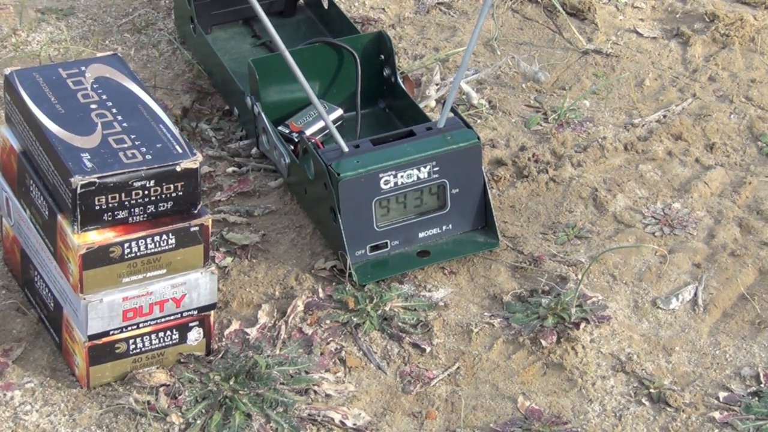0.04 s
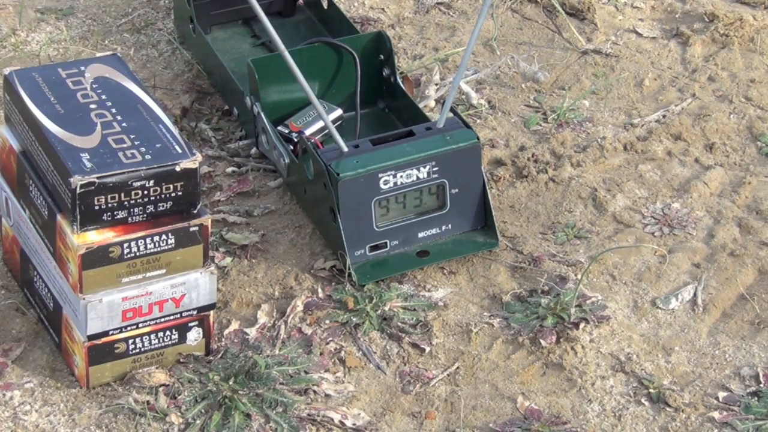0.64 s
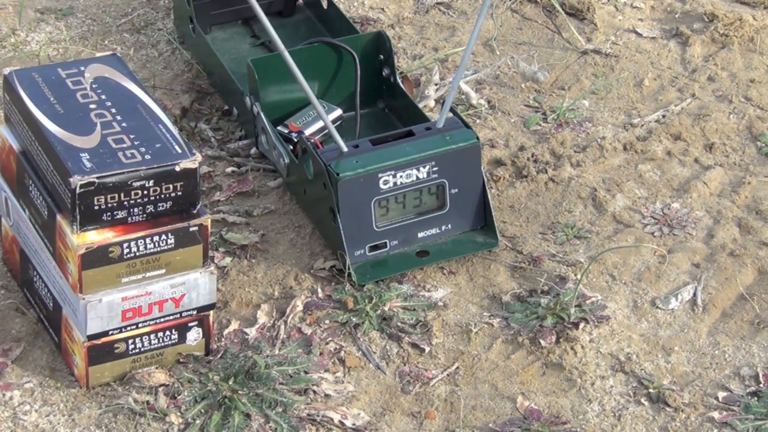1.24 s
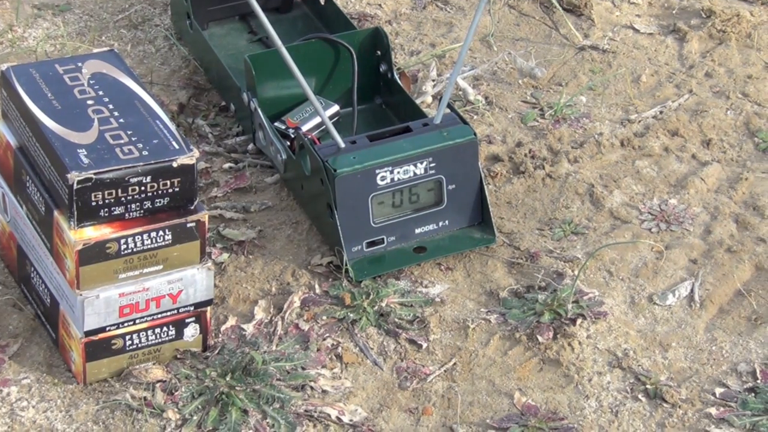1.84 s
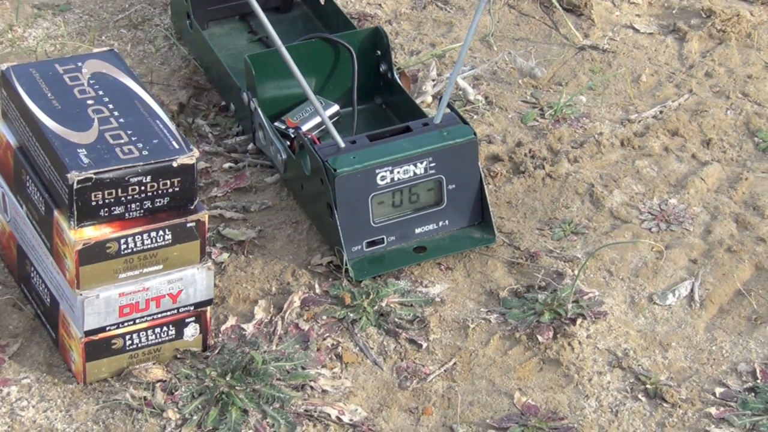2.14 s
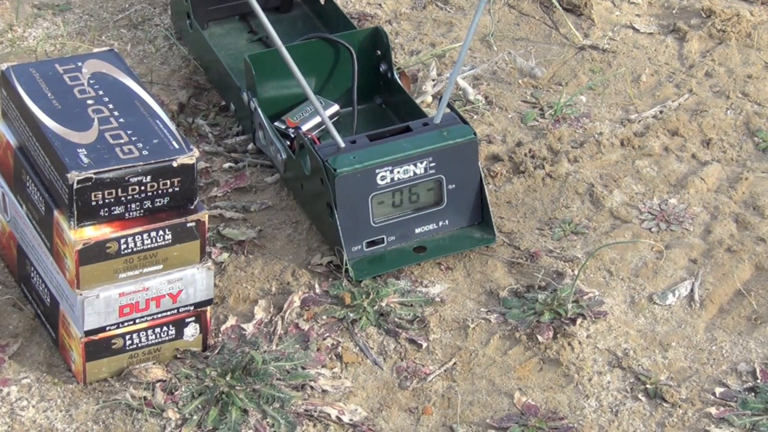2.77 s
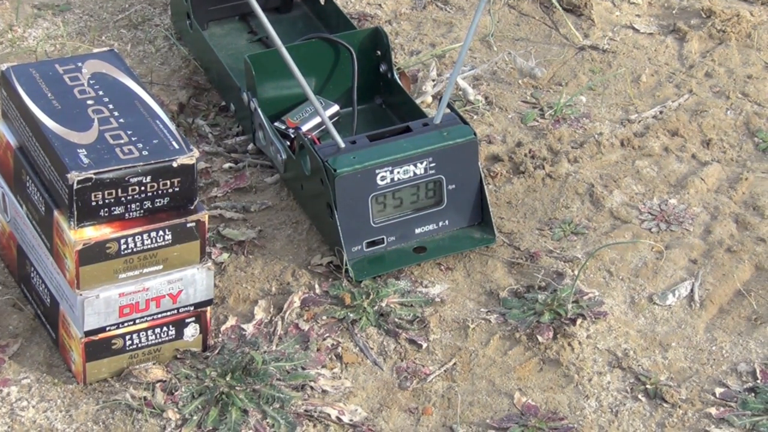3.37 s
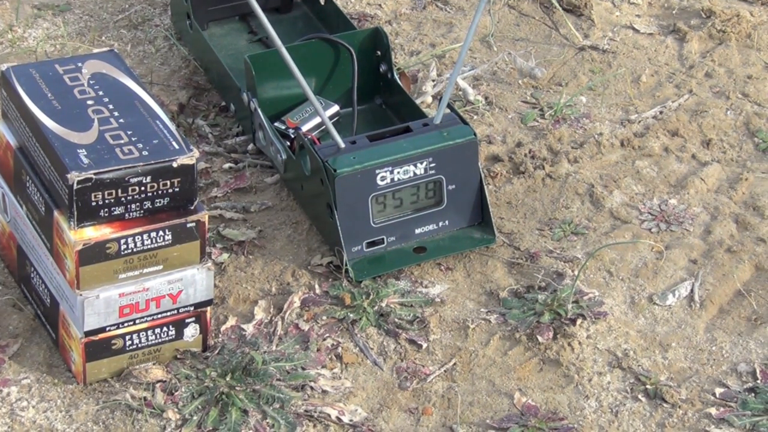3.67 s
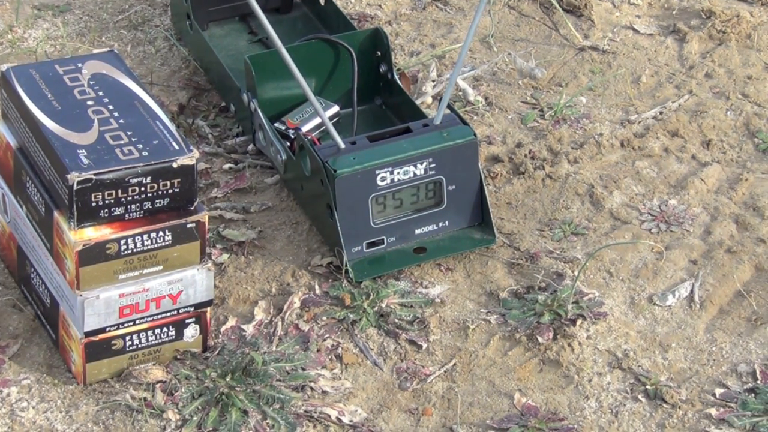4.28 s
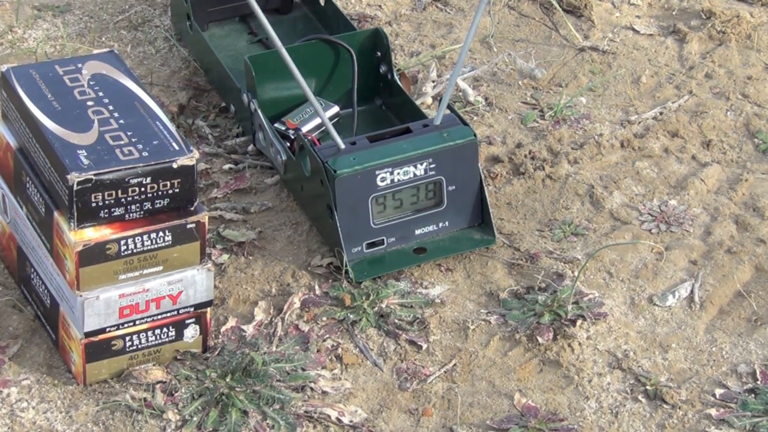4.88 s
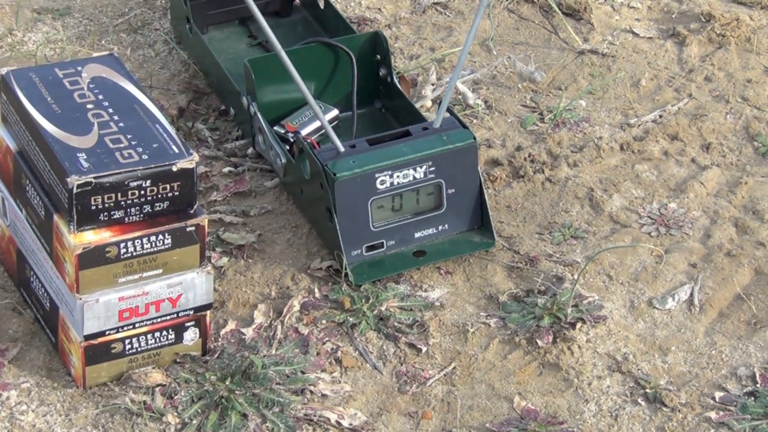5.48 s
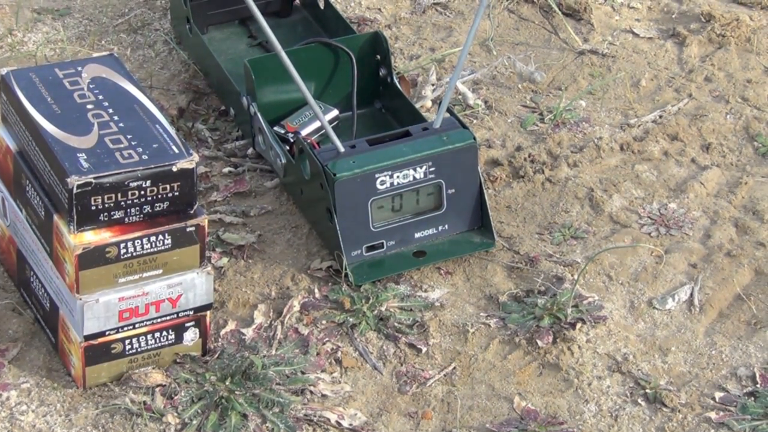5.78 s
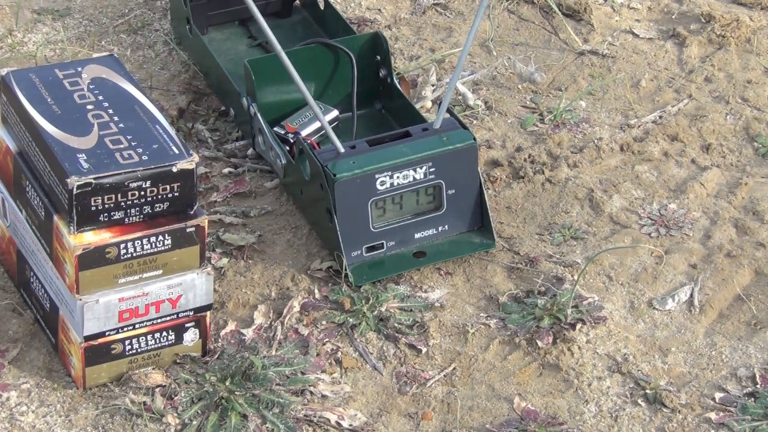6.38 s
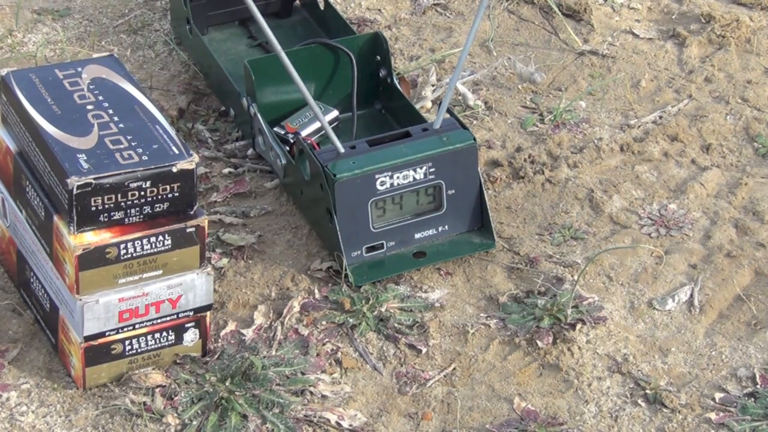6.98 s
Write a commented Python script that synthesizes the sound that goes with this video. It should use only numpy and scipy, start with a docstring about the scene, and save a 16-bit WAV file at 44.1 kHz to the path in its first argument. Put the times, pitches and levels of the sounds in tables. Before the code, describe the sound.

Two pistol shots crack and echo across an outdoor range, with brass cases ringing and bouncing and light metal clicks close by.

```python
"""The echo of an unheard shot fades over an outdoor range, with faint wind and a fainter camera buzz. Then a
pistol fires twice: each crack and boom overloads the microphone and rolls back from the same slopes and trees,
ever duller. Ejected brass cases strike, ring and bounce under the shelter. A tap on the camera, a soft thud on
the bench and light metal clicks and scrapes, a case bouncing among them, sit close by."""
import sys
import numpy as np
from scipy import signal
from scipy.fft import rfft, irfft, next_fast_len
from scipy.io import wavfile
from scipy.ndimage import uniform_filter1d, map_coordinates

SR = 44100
rng = np.random.default_rng(int(sys.argv[2]) if len(sys.argv) > 2 else 0)


def inscribe(sig):
    """Save sig as 16-bit PCM at rate SR to the path in sys.argv[1].

    A 1-D sig is mono; a 2-D sig holds one channel per row.
    Samples are clipped to [-1, 1] before scaling.
    """
    pcm = np.round(np.clip(np.atleast_2d(sig).T, -1, 1) * 32767)
    wavfile.write(sys.argv[1], SR, pcm.astype(np.int16))


N = 309582

# stretches of land that answer a shot: crest delay/s, level/dB, swell/s, fade/(dB per s)
SLOPES = [(.055, -16, 0.034, 31), (0.303, -13, 0.17, 30), (.71, -20, .07, 26.5), (1.02, -30, 0.049, 46),
          (1.36, -32, 0.082, 10.5)]
# single faces that throw back a slap: delay/s, lift over the roll/dB
SLAPS = [(0.324, 0), (0.437, 4), (.538, 4), (.574, 9.5), (.663, 8), (1.04, -1)]
# tone of the echo: f/Hz, level/dB
ECHO_TONE = [(30, -67), (110, -25), (170, -16), (230, -6.5), (320, -2), (450, 0.5), (720, 6), (950, 0.2),
             (1400, -8.5), (3200, -12), (5200, -19), (7800, -13), (9500, -26.5), (15500, -41)]
# what air and foliage take from the farthest returns: f/Hz, loss/dB
AIR_LOSS = [(110, -2.5), (250, -1), (420, -4), (600, 8), (850, 18), (1400, 13.5), (2800, 18.5), (5000, 31),
            (7700, 42.5), (10500, 63), (14000, 102)]
# stereo width at the two microphone ports: f/Hz, side minus mid/dB
WIDTH = [(30, 11), (60, -9), (130, -12), (300, -19), (700, -19), (1400, -14), (3000, -21.5), (7500, -6.5),
         (11000, -17.5), (14000, -38)]
# their balance: f/Hz, left minus right/dB
BALANCE = [(60, 5), (110, -19.5), (200, -2), (400, -1), (700, -0.9), (1300, -2.5), (4400, -4.5),
           (8100, 0.5), (15000, 0)]
# tone of the open-air bed: f/Hz, level/dB
AIR_TONE = [(25, -22), (60, -0.5), (110, -3), (230, 1), (450, -0.5), (800, -5), (1400, -15), (2800, -22),
            (5000, -22.5), (7700, -24.5), (10000, -28), (15800, -30.5)]
# its balance: f/Hz, left minus right/dB
AIR_BALANCE = [(60, -3), (110, -8), (200, -1), (380, 4.5), (700, 3.5), (1290, -1.5), (2380, -1.0),
               (4400, -0.5), (8120, -0.5), (15000, 0)]
# low puffs on the microphone, a breath of wind and then a bump of handling: t/s, level/dB, half-width/s
PUFFS = [(2.076, -37, 0.014), (3.084, -38, 0.046)]
# their rumble: f/Hz, level/dB
PUFF_TONE = [(25, -9.5), (70, -1), (140, -3), (300, -9), (800, -60)]
# the puffs meet each port differently: f/Hz, side minus mid/dB
PUFF_WIDTH = [(30, 8), (80, -12), (200, -9)]
# modes of the camera body: f/Hz, level/dB, t60/s
HOUSING_MODES = [(4280, 0, 0.017), (5320, 3, 0.056), (7800, -3, 0.089)]
# shots, the first heard only as echo: t/s, level/dB, left minus right/dB
SHOTS = [(-1.6, .8, 0), (1.7567, .5, -.8), (5.1078, .7, .6)]
# the blast's crack and first returns: f/Hz, level/dB
CRACK_TONE = [(30, -32), (90, -21), (220, -2), (450, 4.5), (1100, 7.5), (1900, -1.5), (3000, -2.5),
              (5000, -8.5), (7700, -1), (9500, -14), (15500, -23)]
# the low push of the gas: f/Hz, level/dB
BOOM_TONE = [(25, -36), (60, -9.5), (140, -11), (240, 3.5), (400, -1), (900, -43)]
# hard landings of a case, the last three levels relative to the hit:
# t/s, level/dB, knock delay/s, knock f/Hz, knock/dB, rebound/dB, ring/dB
LANDINGS = [(2.291, -20, .01, 2370, -2.5, -17, -9), (2.8501, -23.5, .003, 2060, 0.5, -13.5, -5.5),
            (3.0514, -24, 0.0066, 2120, -10, -17, -32), (3.708, -26, .009, 1680, -1.5, -33.5, -39),
            (5.7008, -17.5, .016, 1300, -.5, -21.5, -38)]
# tone of a case striking: f/Hz, level/dB
STRIKE_TONE = [(500, -28), (900, -6), (1400, -1), (2200, -4), (2900, -2.5), (4000, -5), (6000, -7.5),
               (7750, 2), (9500, -11.5), (15500, -29.5)]
# the shelter's reverb: f/Hz, t60/s
SHELTER_DECAY = [(1000, 0.51), (3000, 0.37), (7500, 0.12), (14000, 0.11)]
# modes of a hollow brass case: f/Hz, level/dB, t60/s
BRASS_MODES = [(7354, 2.5, 0.2), (7370, -1, 0.22), (7450, -2, 0.3), (8102, -19, .2), (13420, -16, .18)]
# a tap on the camera body: f/Hz, level/dB
TAP_TONE = [(500, -25), (1500, -8), (3300, 1), (5300, 6), (7500, -7), (10000, -10), (15000, -28)]
# a case going end over end: t/s, first level/dB, contact count, gap/s, change per contact/dB
TUMBLES = [(3.151, -29, 3, .0415, -4.5), (3.342, -44.5, 2, .07, -9), (3.4858, -46.8, 4, .0378, 1.9)]
# light metallic clicks, among them a case bouncing on something hard: t/s, level/dB
CLICKS = [(4.077, -53), (6.242, -50), (6.352, -40.5), (6.562, -47.5), (6.830, -24), (6.8855, -34),
          (6.905, -30.5)]
# their snap: f/Hz, level/dB
CLICK_TONE = [(650, -50), (1100, -15), (1600, 1), (1860, 11), (2220, -16), (3060, 1), (3550, 0), (3860, -7),
              (4300, -2), (4830, -12), (5980, -12), (7400, -6.5), (14000, -51)]
# modes of what is struck: f/Hz, level/dB, t60/s
CLICK_MODES = [(1820, -25, 0.079), (2500, -11, 0.15), (3100, -6, .07), (3600, -1, .07), (4200, -15, .06)]
# metal sliding around the clicks: t/s, level/dB, half-width/s
SCRAPES = [(6.342, -53, .012), (6.824, -44, 0.032), (6.895, -49, 0.039)]
# its rasp: f/Hz, level/dB
SCRAPE_TONE = [(700, -35), (1800, 2), (2400, -3), (3400, 2), (5500, -9), (7600, 5), (9000, -6),
               (15000, -28)]


def amp(db):
    """Decibels to gain."""
    return 10 ** (np.asarray(db) / 20)


def unit(x):
    """Scale to rms 1."""
    return x / np.sqrt(np.mean(x ** 2) + 1e-20)


def along(points, hz):
    """Read a curve of (f/Hz, value) points on a log axis."""
    f, v = np.transpose(points)
    return np.interp(np.log(hz + 1), np.log(f + 1), v)


def clock(seconds):
    """Sample times from zero."""
    return np.arange(int(seconds * SR)) / SR


def panned(db):
    """Left and right gains for a balance of db to the left."""
    return amp(np.array([db, -db]) / 2)


def filtered(x, response):
    """EQ x with a gain that depends on frequency."""
    n = x.shape[-1]
    m = next_fast_len(n + SR // 2)
    return irfft(rfft(x, m) * response(np.fft.rfftfreq(m, 1 / SR)), m)[..., :n]


def faded(x, gain_db):
    """A moving EQ: the gain depends on frequency and age."""
    hz, age, z = signal.stft(x, SR, nperseg=256)
    return signal.istft(z * amp(gain_db(hz[:, None], age)), SR, nperseg=256)[1][:, :x.shape[-1]]


def noise(tone, t, balance=BALANCE, width=WIDTH):
    """Coloured stereo noise of rms 1, as the two ports hear a diffuse sound."""
    hz = np.fft.rfftfreq(len(t), 1 / SR)
    mid, side = rfft(rng.standard_normal((2, len(t)))) * amp(along(tone, hz))
    side = side * amp(along(width, hz))
    left_right = np.array([mid + side, mid - side]) * panned(along(balance, hz))
    return unit(irfft(left_right, len(t)))


def ringing(modes, t):
    """Decaying modes, met at a chance phase by each port."""
    return sum(amp(db - 60 * t / t60) * np.sin(2 * np.pi * (hz * t + rng.random((2, 1)) / 2))
               for hz, db, t60 in modes)


def swells(rows, t):
    """A bell-shaped gain for each (t/s, level/dB, half-width/s)."""
    return sum(amp(db) * np.exp(-((t - s) / half_width) ** 2) for s, db, half_width in rows)


def grainy(t, size, depth_db=3):
    """A flickering gain of rms 1, in grains of size samples."""
    flicker = unit(uniform_filter1d(rng.standard_normal(len(t)), size=size))
    return unit(amp(depth_db * flicker))


def add(track, s, sound):
    """Mix a sound in at time s, which may lie before the start."""
    start = round(s * SR)
    part = sound[:, max(-start, 0):N - start]
    track[:, max(start, 0):][:, :part.shape[1]] += part


def roll(t, horizon_s=2.94, horizon_db_per_s=28):
    """The echo's envelope: the slopes swell and fade, adding in power, and die off past the horizon."""
    answers = [amp(db - fade * np.maximum(t - s, 0)) * np.exp(-(np.minimum(t - s, 0) / swell) ** 2)
               for s, db, swell, fade in SLOPES]
    return np.linalg.norm(answers, axis=0) * amp(-horizon_db_per_s * np.maximum(t - horizon_s, 0))


def land_echo(clump_db=1.77, clump_hz=260, slap_s=0.0089, near_s=0.13, dulling_s=0.44,
              far_s=1.2, far_left_db=4.0, low_cut_hz=96):
    """Countless reflections in clumps: the longer the path, the duller, and the farthest lean left."""
    t = clock(3.6)
    knots = rng.standard_normal(4096)
    clumps = unit(amp(clump_db * map_coordinates(knots, [t * clump_hz], mode="wrap")))
    slaps_db = sum(db * (t >= s) * np.exp(-((t - s) / slap_s) ** 2) for s, db in SLAPS)
    pan = panned(far_left_db * np.clip(2 * (t - far_s), 0, 1))
    returns = noise(ECHO_TONE, t) * clumps * roll(t) * amp(slaps_db) * pan
    air_db = lambda hz, age: along(AIR_LOSS, hz) * np.expm1(-np.maximum(age - near_s, 0) / dulling_s)
    # keeps deep rumble and thumps out of the echo
    low_cut = lambda hz: 1 - np.exp(-(hz / low_cut_hz) ** 3)
    return filtered(faded(returns, air_db), low_cut)


def breeze(bed_db=-48.5):
    """A quiet bed of open air, with low puffs on the ports from wind and handling."""
    t = np.arange(N) / SR
    bed = amp(bed_db) * noise(AIR_TONE, t, AIR_BALANCE)
    return bed + swells(PUFFS, t) * noise(PUFF_TONE, t, AIR_BALANCE, PUFF_WIDTH)


def camera_buzz(pulse_hz=30, level_db=-63):
    """The camera's works pulse evenly and set its body ringing, very faintly."""
    pulses = np.diff(np.floor(np.arange(N + 1) / SR * pulse_hz))
    housing = ringing(HOUSING_MODES, clock(0.5))
    return amp(level_db) * signal.fftconvolve(pulses[None], housing, axes=1)[:, :N]


def blast(crack_db=-13.5, crack_t60=0.11, hold_s=0.011, volley_db=-17, volley_s=0.04,
          boom_db=-13.5, boom_t60=0.31, rise_s=0.019):
    """The muzzle blast: a bright crack, a rough volley off the shelter, then the low push of the gas."""
    t = clock(0.5)
    crack = amp(crack_db - 60 * np.maximum(t - hold_s, 0) / crack_t60)
    volley = amp(volley_db) * np.exp(-(t / volley_s) ** 6) * grainy(t, size=90)
    boom = amp(boom_db - 60 * t / boom_t60) * (1 - np.exp(-t / rise_s)) ** 2
    return noise(CRACK_TONE, t) * np.hypot(crack, volley) + noise(BOOM_TONE, t) * boom


def pistol(drift=0.34):
    """Every shot meets the same land, so its echo repeats, apart from a share that moving air changes."""
    out = np.zeros((2, N))
    still = land_echo()
    changes = [land_echo() for _ in SHOTS]
    report = blast()
    for (s, db, left_db), change in zip(SHOTS, changes):
        gain = amp(db) * panned(left_db)[:, None]
        add(out, s, gain * report)
        add(out, s, gain * (still + drift * change) / np.hypot(1, drift))
    return out


def case_contact(body_db, body_hz=3600, snap_db=2, snap_t60=0.01, chatter_db=-2, chatter_s=0.02,
                 shelter_db=-5):
    """Rim and mouth snap and chatter, and the shelter adds a tail; body_db is a shelf below body_hz."""
    t = clock(0.5)
    shelf_db = lambda hz: body_db / (1 + (hz / body_hz) ** 4)
    snap = amp(snap_db - 60 * t / snap_t60)
    chatter = amp(chatter_db) * grainy(t, size=48) * np.exp(-(t / chatter_s) ** 2)
    hit = faded(noise(STRIKE_TONE, t), lambda hz, age: shelf_db(hz)) * np.hypot(snap, chatter)
    tail_db = lambda hz, age: shelf_db(hz) - 60 * age / along(SHELTER_DECAY, hz)
    return hit + amp(shelter_db) * faded(noise(STRIKE_TONE, t), tail_db)


def knock(hz, decay_s=0.018, tail_db=-7, tail_t60=0.18, spread=1.51, skirt_db=-60):
    """The dull clack of a board, a broad band around hz, with the shelter's answer."""
    t = clock(0.5)
    band = [(hz / 20, skirt_db), (hz / spread, 0), (hz * spread, 0), (hz * spread ** 5, skirt_db)]
    return noise(band, t) * np.hypot(np.exp(-(t / decay_s) ** 2), amp(tail_db - 60 * t / tail_t60))


def case_landings(body_db=-1.5, flight_s=0.054):
    """The rim strikes and rings, the side follows with a duller knock, and the case rebounds once."""
    out = np.zeros((2, N))
    for s, db, knock_s, knock_hz, knock_db, rebound_db, ring_db in LANDINGS:
        strike = case_contact(body_db) + amp(ring_db) * ringing(BRASS_MODES, clock(0.5))
        add(out, s, amp(db) * strike)
        add(out, s + knock_s, amp(db + knock_db) * knock(knock_hz))
        add(out, s + flight_s, amp(db + rebound_db) * case_contact(body_db))
    return out


def case_tumbles(bright_db=-27.5, dulling_per_db=0.7058):
    """A tumbling case touches down at even steps; the softer the touch, the duller."""
    out = np.zeros((2, N))
    for s, first_db, count, gap_s, change_db in TUMBLES:
        for k in range(int(count)):
            db = first_db + k * change_db
            add(out, s + k * gap_s, amp(db) * case_contact(body_db=dulling_per_db * (bright_db - db)))
    return out


def camera_tap(at_s=3.1409, level_db=-22, t60=0.026):
    """One dry, bright tap on the camera body."""
    out, t = np.zeros((2, N)), clock(0.5)
    add(out, at_s, noise(TAP_TONE, t) * amp(level_db - 60 * t / t60))
    return out


def metal_clicks(hold_s=0.0043, t60=0.031, tail_db=-17, tail_t60=0.3, ring_db=-4):
    """Hard metal chatters for an instant, close up, with a short ring and a weak tail."""
    out, t = np.zeros((2, N)), clock(0.5)
    envelope = amp(-60 * np.maximum(t - hold_s, 0) / t60) + amp(tail_db - 60 * t / tail_t60)
    for s, db in CLICKS:
        snap = noise(CLICK_TONE, t) * envelope
        add(out, s, amp(db) * (snap + amp(ring_db) * ringing(CLICK_MODES, t)))
    return out


def bench_thud(at_s=4.077, level_db=-42, hz=280):
    """Something is set down softly on the bench: one low knock."""
    out = np.zeros((2, N))
    add(out, at_s, amp(level_db) * knock(hz))
    return out


def metal_scrapes():
    """Sliding metal rasps in short, grainy swells."""
    t = np.arange(N) / SR
    return noise(SCRAPE_TONE, t) * grainy(t, size=64) * swells(SCRAPES, t)


def scene():
    """Shots up front, brass and small handling sounds beneath, all on a bed of open air."""
    shooting = pistol() + case_landings() + case_tumbles()
    handling = metal_clicks() + metal_scrapes() + camera_tap() + bench_thud()
    return shooting + handling + breeze() + camera_buzz()


def record(dry, ceiling=0.88, top_hz=16000):
    """The overloaded microphone rounds off the loudest peaks; the very top is cut away."""
    rounded = dry / (1 + (dry / ceiling) ** 4) ** (1 / 4)
    return filtered(rounded, lambda hz: hz < top_hz)


dry = scene()
out = record(dry)
inscribe(out)
```